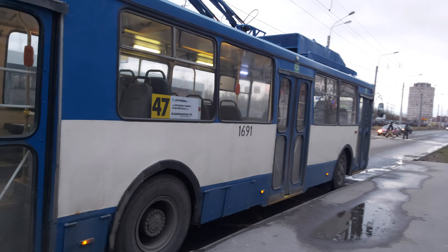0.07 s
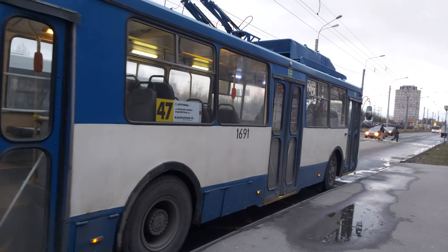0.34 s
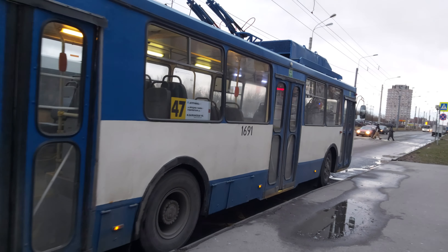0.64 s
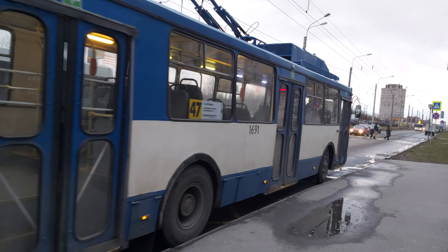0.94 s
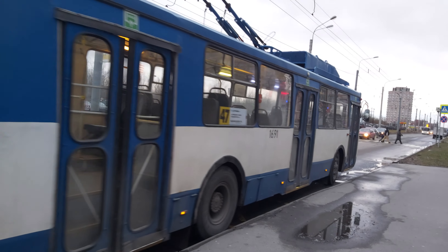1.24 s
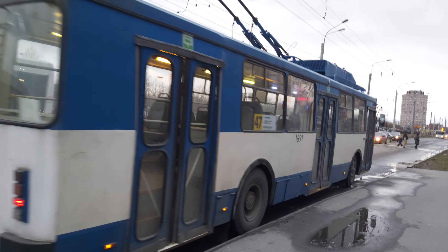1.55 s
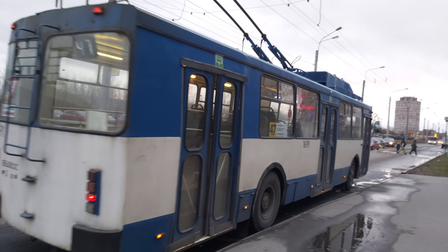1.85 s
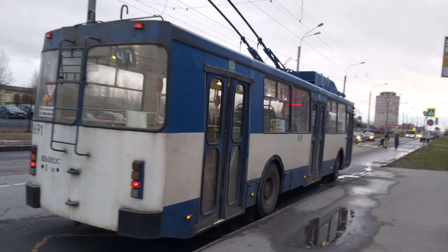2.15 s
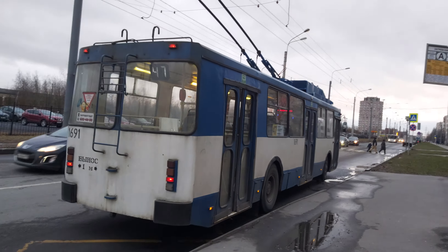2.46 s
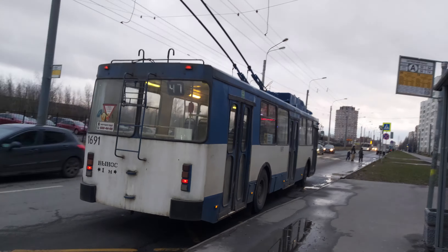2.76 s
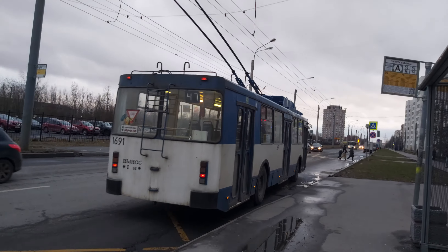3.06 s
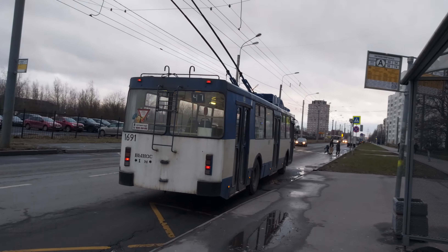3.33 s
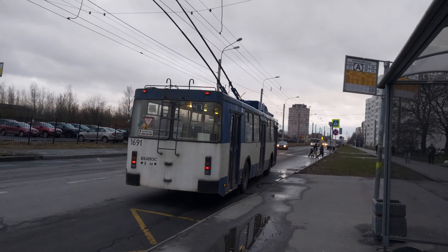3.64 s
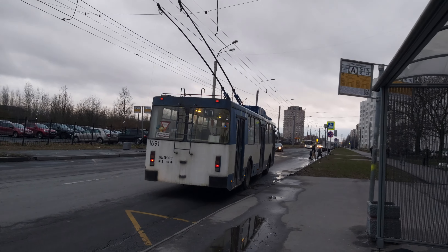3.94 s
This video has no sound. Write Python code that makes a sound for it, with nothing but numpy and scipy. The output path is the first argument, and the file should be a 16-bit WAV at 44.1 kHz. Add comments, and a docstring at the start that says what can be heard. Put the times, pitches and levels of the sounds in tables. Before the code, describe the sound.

A trolleybus pulls away slightly to the left, its motor whine rising throughout over body rumble, a low engine drone and distant traffic. Light metal clinks and a short hiss come around 1 second, with brief squeals from the overhead wires. Wet tyres swell and a car passes at about 2 seconds. From 3 seconds the poles and fittings clack sharply while the ringing of the wires sinks and fades.

```python
"""At a stop on a wet road, heard through two microphone ports a hand apart, the bus on the left.
Over far traffic, a droning engine and wet tyres, a trolleybus pulls away: its drive whines upward
and shakes the body. Metal clinks, the collector shoes squeal and sing on the wires, a valve spits.
Two seconds in, a car passes beyond the bus, its whine falling. As the bus recedes, a shoe whistles
thinly, poles and fittings clack and the ring of the wires sinks."""
import sys
import numpy as np
from scipy import signal
from scipy.fft import rfft, irfft
from scipy.io import wavfile
from scipy.ndimage import map_coordinates

SR = 44100
rng = np.random.default_rng(int(sys.argv[2]) if len(sys.argv) > 2 else 0)


def wav_out(sig):
    """Save sig, one row per channel (or a flat mono array), as 16-bit PCM at SR to the path in sys.argv[1]."""
    wavfile.write(sys.argv[1], SR, np.round(np.clip(np.atleast_2d(sig).T, -1, 1) * 32767).astype(np.int16))


N = 176400
T = np.arange(N) / SR
BIN_HZ = np.arange(N // 2 + 1) * SR / N
PORTS_MS, BUS_LEAD_MS = 0.61, 0.13  # travel time between the ports; the left one's lead for the bus

# pitch of the drive, rising with road speed: t/s, f/Hz
DRIVE_PITCH = [(0, 71.2), (.68, 120), (.92, 153.9), (1.3, 197), (1.7, 237.6), (2.25, 294.3), (2.7, 332.3),
               (3.1, 375), (3.6, 403.6), (4, 425.6)]


def undb(db):
    """Decibels to gain."""
    return 10 ** (np.asarray(db) / 20)


def unit(x):
    """Scale to rms 1."""
    return x / np.sqrt(np.mean(x ** 2))


def curves(table):
    """Each column of a table, joined by straight lines in time."""
    times, *columns = np.array(table, float).T
    return [np.interp(T, times, c) for c in columns]


def noise():
    """White noise."""
    return rng.standard_normal(N)


def walk(rate_hz):
    """A smooth random wander with spread 1."""
    return unit(irfft(rfft(noise()) * np.exp(-(BIN_HZ / rate_hz) ** 2) * (BIN_HZ > 0), N))


def colour(x, spectrum):
    """Shape by points of f/Hz, relative level/dB; rms 1."""
    hz, db = np.array(spectrum, float).T
    gain = undb(np.interp(np.log(np.maximum(BIN_HZ, 1)), np.log(hz), db))
    return unit(irfft(rfft(x) * gain, N))


def resonate(x, hz, width_hz):
    """A resonance applied twice, for steep sides."""
    b, a = signal.iirpeak(hz, hz / width_hz, fs=SR)
    return signal.lfilter(b, a, signal.lfilter(b, a, x))


def ringing(modes):
    """Scraping or shaking keeps resonances ringing; rms 1."""
    return unit(sum(undb(db) * unit(resonate(noise(), hz, width)) for hz, width, db in modes))


def wavering(hz, waver, flutter_db):
    """A rough tone whose pitch wavers by a share of itself and whose level flutters; rms 1."""
    phase = 2 * np.pi * np.cumsum(hz * (1 + waver * walk(60))) / SR
    return unit(np.sin(phase) * undb(flutter_db * walk(50)))


def burst(x, start, peak_db, attack_s, decay_s):
    """A quick rise and an exponential fall."""
    age = np.maximum(T - start, 0)
    shaped = x * (1 - np.exp(-age / attack_s)) * np.exp(-age / decay_s)
    return shaped * undb(peak_db) / np.abs(shaped).max()


def ports(x, lead_ms, pan_db=0):
    """Sound from one direction: the left port hears it lead_ms earlier and pan_db louder."""
    shift = lead_ms * SR / 1000 / 2
    return np.array([map_coordinates(x, [np.arange(N) + s * shift], order=3, mode="mirror")
                     * undb(s * pan_db / 2) for s in (1, -1)])


def around(make):
    """Sound from all directions: alike at both ports in the bass, unrelated in the treble."""
    likeness = np.sinc(2 * BIN_HZ * PORTS_MS / 1000)
    mid, side = (irfft(rfft(make()) * np.sqrt((1 + s * likeness) / 2), N) for s in (1, -1))
    return np.array([mid + side, mid - side])


def placed(make, lead_ms, scatter_db, pan_db=0):
    """A direct source plus its scatter from road and house fronts."""
    pair = unit(ports(make(), lead_ms) + undb(scatter_db) * around(make))
    return pair * undb(np.array([[pan_db], [-pan_db]]) / 2)


def echoed(x, lead_ms, wet_db, t60):
    """A short sound with the street's tail behind it."""
    tail = rng.standard_normal((2, N // 2)) * undb(-60 * T[:N // 2] / t60)
    tail /= np.sqrt(np.sum(tail ** 2) / 2)
    return ports(x, lead_ms) + undb(wet_db) * signal.fftconvolve(x[None], tail, axes=1)[:, :N]


def street():
    """Far traffic all round the microphone, with a stream of it to the right."""
    # wash of the traffic: f/Hz, relative level/dB
    spectrum = [(15, -71), (25, -56), (48, -20), (61, -14), (82, -5), (107, -17), (180, -18.5),
                (225, -13.5), (265, -14.5), (305, -13), (400, -19.5), (560, -21), (750, -24.5),
                (1050, -21.5), (1500, -26), (2010, -29), (3090, -43), (4500, -46.5), (7500, -62.5),
                (8500, -58.5), (15500, -67)]
    wash = placed(lambda: colour(noise(), spectrum), lead_ms=-0.25, scatter_db=13)
    return wash * undb(-30 + .5 * walk(1.9))


def engine():
    """Off to the left, a low exhaust drone sinks in pitch as its vehicle goes by."""
    # exhaust note: t/s, firing rate/Hz, fundamental/dB, second harmonic/dB
    exhaust = [(0, 82.85, -34, -47), (.3, 78.9, -27, -44), (.53, 75.95, -27, -48), (.68, 74.45, -35, -39),
               (.95, 66.74, -33.5, -43), (1.3, 64.43, -26.5, -35), (1.55, 67.2, -32, -48),
               (1.7, 67.9, -26.5, -37), (2.04, 62.45, -26.5, -39), (2.25, 56.33, -26.5, -29.5),
               (2.55, 56.86, -22.5, -27.5), (2.75, 56.4, -22, -33.5), (2.95, 57.58, -28.5, -33),
               (3.2, 59.23, -24.5, -27), (3.6, 60.3, -24, -29.5), (4, 60.5, -25.5, -28)]
    hz, first_db, second_db = curves(exhaust)
    phase = 2 * np.pi * np.cumsum(hz * (1 + 0.0089 * walk(8))) / SR
    harmonics = enumerate((first_db, second_db, second_db - 13.5), 1)
    drone = np.sqrt(2) * sum(undb(db + 1.1 * walk(21)) * np.sin(k * phase) for k, db in harmonics)
    return ports(drone, lead_ms=0.65, pan_db=-1.1)


def tyres():
    """Treads roar and patter on wet asphalt and throw a spray of droplets."""
    # tyres going by: t/s, roar/dB, spray/dB, lead of the left port/ms
    passage = [(0, -40.5, -54.5, 0.44), (1.3, -39, -48.5, 0.39), (1.6, -35, -49.5, 0.44),
               (1.83, -31, -47.5, 0.42), (2.4, -31, -48.5, .47), (3.05, -31.5, -44.5, 0.56),
               (3.5, -34.5, -47.5, 0.55), (4, -32, -48.5, 0.48)]
    # tread roar: f/Hz, relative level/dB
    roar_spectrum = [(150, -55), (400, -0.5), (600, -9.5), (900, -1.5), (1300, -3), (1900, -11),
                     (2300, -11.5), (2900, -14.5), (4500, -28.5), (9000, -42.5)]
    # spray: f/Hz, relative level/dB
    spray_spectrum = [(1500, -51), (3400, 4.5), (4200, 3.5), (5000, -0.5), (5800, 1.5), (6400, -1),
                      (7400, 2), (8400, -8), (11500, -5.5), (16000, -10)]
    roar_db, spray_db, lead_ms = curves(passage)
    patter = undb(1.9 * walk(60))
    roar = placed(lambda: colour(noise() * patter, roar_spectrum), lead_ms, scatter_db=-2.5, pan_db=1)
    drops = lambda: noise() * undb(2 * np.minimum(rng.exponential(size=N), 8))
    spray = placed(lambda: colour(drops(), spray_spectrum), lead_ms, scatter_db=9.5)
    return roar * undb(roar_db + .9 * walk(22)) + spray * undb(spray_db + .9 * walk(25))


def ticks(count=110, decay_s=0.0021, growth_db_per_s=1.8):
    """Droplets and grit tick at random on the wet road, harder as the speed grows."""
    # one tick: f/Hz, relative level/dB
    spectrum = [(2500, -20), (4000, 3), (6000, 4), (7400, 6), (8500, -2.5), (12500, -5), (15500, -12)]
    when, softness = rng.random((count, 2)).T
    hits = np.bincount((when * N).astype(int), undb(-18 * softness), N)
    fading = signal.lfilter([1], [1, -np.exp(-1 / (decay_s * SR))], hits)
    ticking = placed(lambda: colour(noise() * fading, spectrum), lead_ms=0.555, scatter_db=-21)
    return ticking * undb(-64 + growth_db_per_s * T)


def throb(per_whine_cycle=.018, depth_db=1):
    """Gain of a throb that quickens with road speed."""
    rate_hz = per_whine_cycle * curves(DRIVE_PITCH)[0]
    return undb(depth_db * np.sin(2 * np.pi * np.cumsum(rate_hz) / SR))


def drive():
    """The gear mesh whines upward, rough and throbbing under load, over the motor's lower growl."""
    # gear whine: t/s, level/dB
    whine_level = [(0, -39), (.71, -36.5), (.75, -16.5), (.81, -27.5), (.92, -23), (.99, -36.5),
                   (1.18, -28), (1.35, -26.5), (1.45, -57), (1.72, -35.5), (1.89, -41), (1.97, -25),
                   (2.05, -42), (2.13, -30), (2.36, -29), (2.45, -35), (2.68, -29.5), (3.05, -31),
                   (3.3, -31.5), (3.4, -40.5), (4, -55)]
    # its partials: multiple of the pitch, relative level/dB
    orders = [(1, 4), (2, -20)]
    # motor growl: t/s, level/dB
    growl_level = [(0, -50), (1.05, -42), (1.2, -30), (1.42, -34), (1.57, -29), (1.8, -34.5), (2.1, -49),
                   (2.6, -40), (3.3, -44.5), (4, -59)]
    hz = curves(DRIVE_PITCH)[0] * (1 + .014 * walk(25))
    phase = 2 * np.pi * np.cumsum(hz) / SR
    mesh = unit(sum(np.sin(k * phase) * undb(db + 2.6 * walk(45)) for k, db in orders))
    whine = mesh * throb() * undb(curves(whine_level)[0])
    growl = wavering(.71 * hz, waver=0.019, flutter_db=3) * undb(curves(growl_level)[0])
    return ports(whine + growl, BUS_LEAD_MS, pan_db=-1.5)


def body():
    """The chassis rumbles and the side panels boom and throb; one panel breaks into a hum."""
    # shaking of the body: t/s, chassis rumble/dB, panel boom/dB
    shake = [(0, -39, -40), (.55, -34, -32.5), (.8, -31, -36), (1.35, -29, -31.5), (1.6, -27.5, -30.5),
             (1.88, -27.5, -31.5), (1.97, -25, -26), (2.2, -27.5, -29.5), (2.6, -28.5, -30),
             (3.1, -29, -31.5), (3.6, -31.5, -31), (4, -30, -33.5)]
    # chassis rumble: f/Hz, relative level/dB
    chassis = [(20, -29), (40, -9), (65, -3), (105, 2.5), (165, -1), (220, -6), (400, -46), (900, -58)]
    # panel resonances: f/Hz, width/Hz, relative level/dB
    panels = [(258, 40.5, 0), (315.5, 74, 4.5), (376.2, 21.7, -1.5), (411.5, 67, -1)]
    # the humming panel: t/s, level/dB
    hum_level = [(1.1, -55), (1.3, -32), (1.6, -40.5), (1.9, -36), (2.1, -32.5), (2.17, -49), (2.4, -45),
                 (2.5, -27.5), (2.6, -52)]
    rumble_db, boom_db = curves(shake)
    rumble = placed(lambda: colour(noise(), chassis), BUS_LEAD_MS, scatter_db=-5.5, pan_db=-1)
    boom = placed(lambda: ringing(panels), lead_ms=0.36, scatter_db=-4, pan_db=-4) * throb()
    hum = wavering(hz=375.2, waver=.012, flutter_db=1) * undb(curves(hum_level)[0])
    return rumble * undb(rumble_db) + boom * undb(boom_db) + ports(hum, lead_ms=0.3, pan_db=-4)


def wires(sink_from_s=3.1, sink_per_s=.05, drift=.008):
    """Overhead, hissing shoes scrape the wires into a fluttering ring that sinks as they recede."""
    # shoes on the wires: t/s, ring/dB, hiss/dB
    singing = [(0, -60, -67), (1.35, -49.5, -70), (1.8, -60, -60), (2.12, -41.5, -53), (2.32, -50, -59),
               (2.45, -41.5, -63), (2.7, -40, -68), (2.92, -34.5, -54), (3.45, -41.5, -66), (4, -47.5, -75)]
    # wire resonances: f/Hz, width/Hz, relative level/dB
    wire_modes = [(1752, 43, -3.5), (1934, 70, -2), (2144, 134, 2), (2197, 83, -14), (2550, 120, -4)]
    # bands of shoe hiss: f/Hz, width/Hz, relative level/dB
    shoe_bands = [(5850, 120, 0), (7400, 860, 2.5), (12000, 1200, -5), (13200, 600, -12)]
    ring_db, hiss_db = curves(singing)
    pitch_ratio = 1 - sink_per_s * np.maximum(T - sink_from_s, 0) + drift * walk(5.04)
    sinking = lambda: map_coordinates(ringing(wire_modes), [np.cumsum(pitch_ratio)], mode="mirror")
    ring = placed(sinking, lead_ms=0.46, scatter_db=-2) * undb(ring_db + 2 * walk(18) + 2.5 * walk(70))
    hiss = placed(lambda: ringing(shoe_bands), lead_ms=0.67, scatter_db=-9) * undb(hiss_db)
    return ring + hiss


def fittings(rattle_count=36, rattle_from_s=1.7):
    """Poles and loose fittings clink, rattle and clack as the bus gathers speed."""
    # light metal clinks: t/s, peak/dB, f/Hz
    taps = [(.565, -34, 4410), (1.064, -37.5, 3500), (1.101, -30.5, 3280), (3.62, -40, 3480),
            (3.786, -43, 3603)]
    # blows of poles and fittings: t/s, peak/dB, brightest f/Hz
    blows = [(3.026, -22, 1929), (3.094, -16, 1542), (3.327, -20, 1600), (3.345, -21, 1800),
             (3.404, -19, 1400), (3.822, -15, 1100), (3.952, -17, 1610)]
    clacks = sum(clack(*blow) for blow in blows)
    span_s = T[-1] - rattle_from_s
    rattle = sum(clack(rattle_from_s + when * span_s, -25.5 - 6 * softness, 1000 + 1200 * brightness)
                 for when, softness, brightness in rng.random((rattle_count, 3)))
    clinks = sum(burst(resonate(noise(), hz, width_hz=300), t, db, attack_s=.0015, decay_s=.011)
                 for t, db, hz in taps)
    return echoed(clacks + rattle + clinks, lead_ms=0.553, wet_db=-10, t60=.8)


def squeals():
    """Now and then a shoe grips the wire overhead: a squeal swells and dies away."""
    # grips of a shoe: t/s, length/s, level/dB, f/Hz
    grips = [(0.971, 0.22, -41.5, 1753), (1.42, .11, -39, 2140), (1.525, 0.078, -33.5, 2138),
             (1.634, 0.3, -41.5, 2150), (2.39, .16, -39, 2114), (2.621, 0.13, -44, 2125),
             (2.67, .14, -38, 1773), (3.26, 0.19, -37, 1737), (3.396, .14, -45, 2144),
             (3.523, .13, -41, 2054), (3.8, .26, -38, 1453)]
    tones = np.zeros(N)
    for start, length, db, hz in grips:
        progress = np.clip((T - start) / length, 0, 1)
        swell = np.sqrt(np.abs(np.sin(np.pi * progress)))
        tones += wavering(hz, waver=0.0112, flutter_db=2.5) * swell * undb(db)
    return ports(tones, lead_ms=0.39)


def spits():
    """On the left a valve or a sparking shoe sputters once; later, brief splashes, and a sharp tick as a
    fitting is struck."""
    # spits of air, sparks or water, and the sharp tick of a struck fitting: t/s, peak/dB, decay/s
    sputters = [(1.197, -35, .006), (1.202, -31, .013), (1.224, -41, .011), (3.401, -34, 0.005),
                (3.735, -37, 0.004), (3.81, -37, 0.0038)]
    # their hiss: f/Hz, relative level/dB
    spectrum = [(2000, -2), (4000, 9), (5500, 8), (8000, 4), (9500, 9), (11300, 8.5), (12800, 4),
                (15500, 1)]
    hiss = colour(noise(), spectrum)
    bursts = sum(burst(hiss, t, db, attack_s=.002, decay_s=decay) for t, db, decay in sputters)
    return echoed(bursts, lead_ms=0.538, wet_db=-18, t60=0.32)


def car(passes_s=2.0, speed_m_s=14, distance_m=6, fade_s=0.46):
    """A car passes beyond the bus, six metres off: its whine falls in pitch and its treads howl."""
    # whine at the source: f/Hz, level/dB
    partials = [(1200, -37), (1755, -42.5), (2370, -50.5)]
    # tread howl: t/s, level/dB
    howl_level = [(1.7, -62), (1.92, -40), (2.2, -38), (2.45, -42), (2.65, -62)]
    along_m = speed_m_s * (T - passes_s)
    doppler = 1 / (1 + speed_m_s / 343 * along_m / np.hypot(along_m, distance_m))
    whine = sum(wavering(hz * doppler, waver=0.01245, flutter_db=5) * undb(db) for hz, db in partials)
    swell = np.exp(-((T - passes_s) / fade_s) ** 2)
    howl = wavering(hz=1236, waver=0.01, flutter_db=6) * undb(curves(howl_level)[0])
    return ports(whine * swell + howl, lead_ms=0.47)


def clack(start, peak_db, bright_hz, attack_s=.0003):
    """One blow rings the fittings, most strongly near its brightest pitch."""
    # resonances of the fittings: f/Hz, decay/s
    modes = [(1060, 0.0078), (1270, 0.0065), (1490, 0.0053), (1790, 0.0062), (1980, 0.0043), (2250, 0.0056)]
    age = T[:N // 50]
    detunes = 1 + .015 * rng.standard_normal(len(modes))
    ring = np.zeros_like(age)
    for (hz, decay), detune in zip(modes, detunes):
        weight = np.exp(-(np.log(hz / bright_hz) / 0.36) ** 2)
        ring += weight * np.exp(-age / decay) * np.sin(2 * np.pi * (hz * detune * age + rng.random()))
    ring *= 1 - np.exp(-age / attack_s)
    return np.pad(ring * undb(peak_db) / np.abs(ring).max(), (int(start * SR), N))[:N]


def whistle():
    """A sliding shoe whistles thinly for a moment as the bus draws off."""
    # the whistle: t/s, level/dB
    level = [(2.7, -75), (2.88, -53), (3.03, -63), (3.4, -64), (3.55, -77)]
    # resonance of the shoe: f/Hz, width/Hz, relative level/dB
    mode = [(5770, 240, 0)]
    return ports(ringing(mode) * undb(curves(level)[0]), lead_ms=.52)


def scene():
    """Bus, traffic and street as they reach the microphone at the stop."""
    return (drive() + body() + wires() + squeals() + whistle() + engine() + car()
            + tyres() + ticks() + fittings() + spits() + street())


def record(dry):
    """The recorder cuts the top steeply above 15750 Hz."""
    return signal.sosfilt(signal.ellip(12, .1, 90, 15750, fs=SR, output="sos"), dry)


dry = scene()
out = record(dry)
wav_out(out)
```